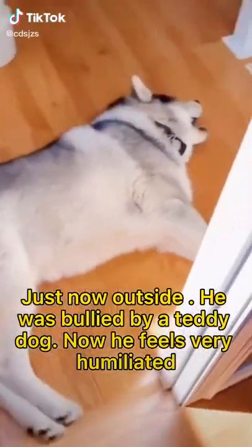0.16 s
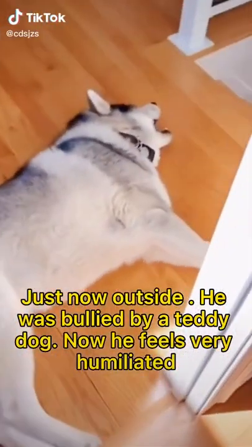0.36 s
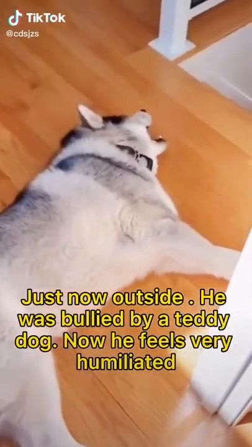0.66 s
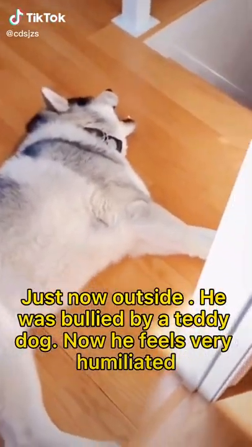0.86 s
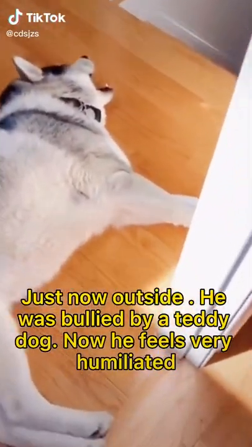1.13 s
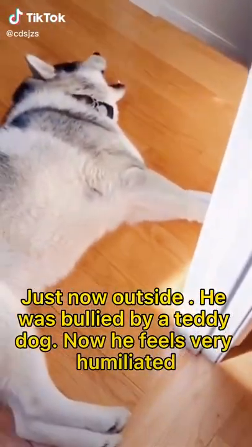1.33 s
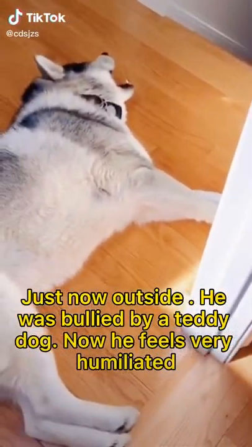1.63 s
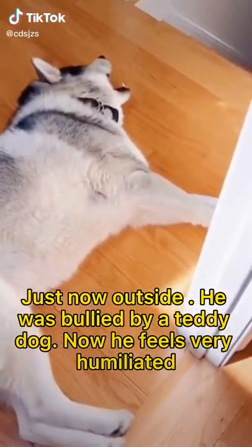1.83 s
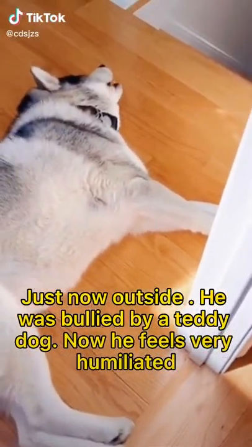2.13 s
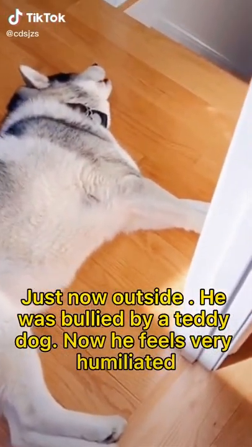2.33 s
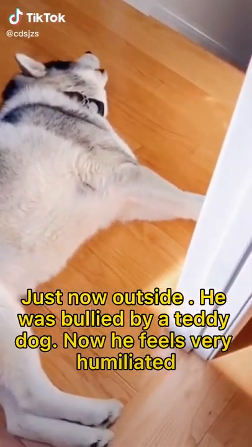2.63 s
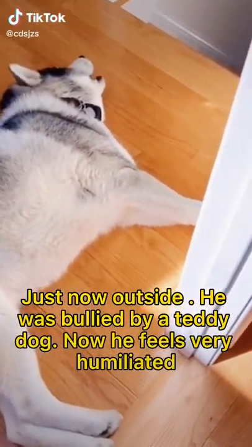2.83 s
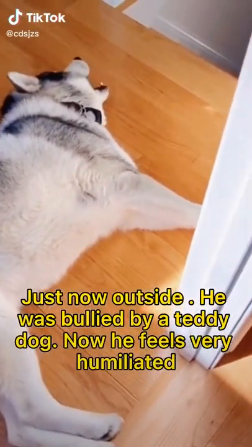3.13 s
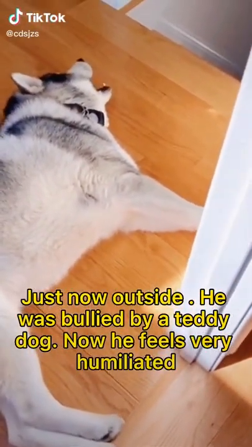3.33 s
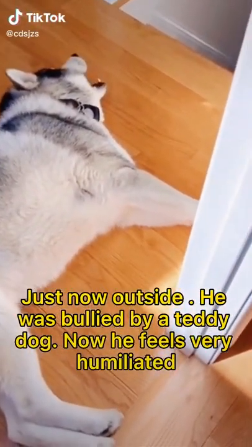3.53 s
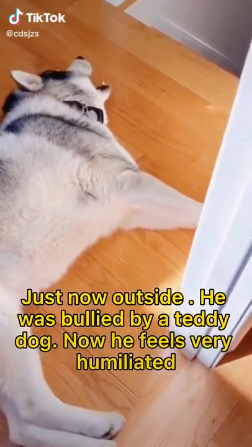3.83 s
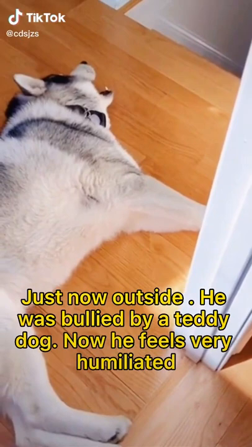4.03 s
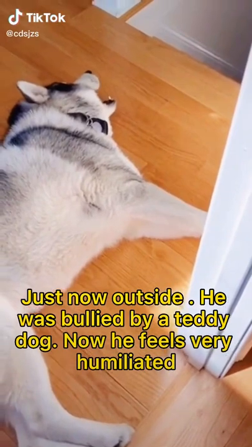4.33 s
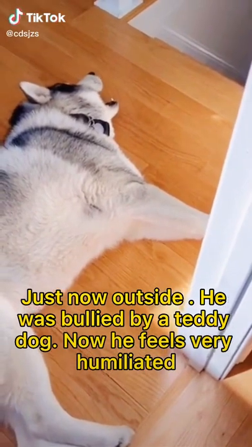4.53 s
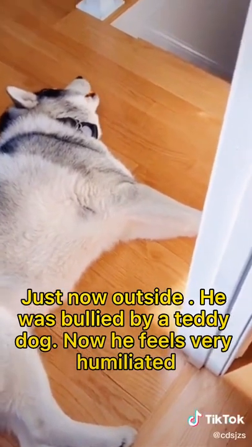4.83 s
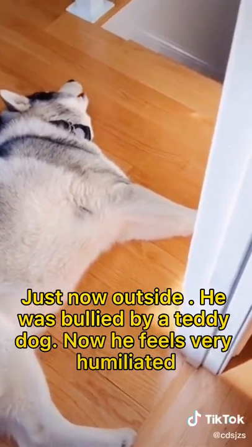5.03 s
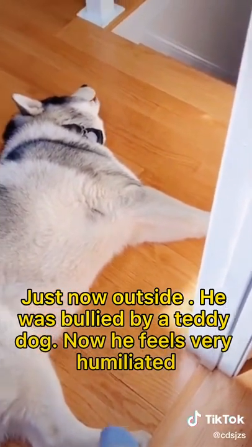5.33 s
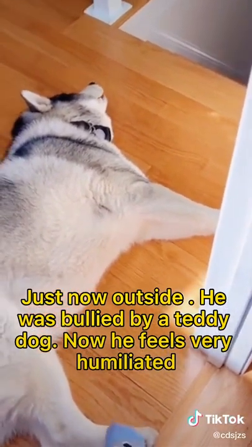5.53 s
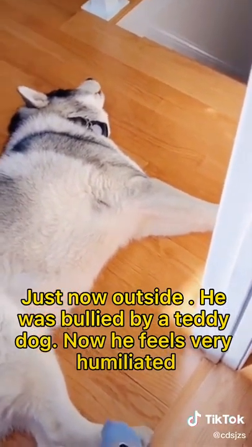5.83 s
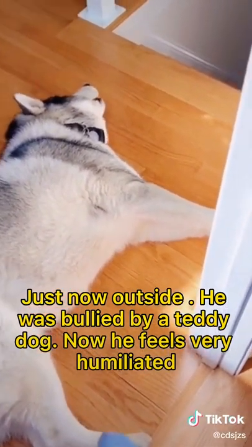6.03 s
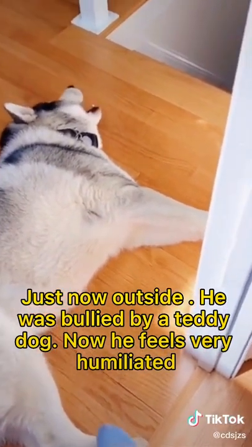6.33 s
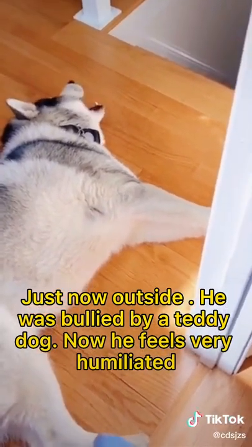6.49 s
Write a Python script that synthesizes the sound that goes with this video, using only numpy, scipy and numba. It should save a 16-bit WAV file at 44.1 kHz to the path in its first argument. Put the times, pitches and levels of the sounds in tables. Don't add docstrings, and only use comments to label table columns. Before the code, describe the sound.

A large dog howls three times in a bare echoing room, first a long pure steady note, then a hoarse cracking one, then a loud short one.

```python
import sys
import numpy as np
from scipy import signal
from scipy.fft import rfft, irfft, next_fast_len
from scipy.io import wavfile
from scipy.ndimage import uniform_filter1d, minimum_filter1d
from numba import njit

SR = 44100
rng = np.random.default_rng(int(sys.argv[2]) if len(sys.argv) > 2 else 0)


def volts_from_db(level):
    exponent = np.asarray(level, float) / 20
    return 10 ** exponent


def dump(signal):
    limited = np.clip(np.atleast_2d(signal).T, -1, 1)
    pcm = np.round(limited * 32767).astype(np.int16)
    wavfile.write(sys.argv[1], SR, pcm)


N = 293706
LEAD = SR // 2
STEP = 64

# f/Hz, level/dB
QUIET_ROOM = [(12, -40), (20, -4.5), (58, -15), (248, -24.5), (287, -35), (784, -33.5), (1380, -55.5),
              (2590, -46), (3000, -48.5), (3900, -86.5), (6600, -120)]
QUIET_ROOM_DB = -58.5
# t/s, peak level/dB
SHIFTS = [
    (2.144, -31.5),
    (2.309, -44),
]
RUSTLE_UP_DB_S, RUSTLE_DOWN_DB_S = 240, 198
HAND_DB, HAND_STOPS_S, HAND_FADE_DB_S = -54, 0.72, 32.5

# f/Hz, time/s
ECHO_TIMES = [(300, 0.37), (1000, 0.64), (3000, 0.42), (9000, 0.58)]
DIRECT_DB, ROOM_DB, FIRST_WALL_S = -5.5, -5, 0.0066
NEXT_ROOM_DB, NEXT_ROOM_SLOWER = -37, 1.5
EVENNESS, EVEN_S = 0.34, 0.14
# t/s, depth/dB, half-length/s
CANCELLATIONS = [
    (.065, 14, .015),
    (.172, 14, .015),
    (.3, 4, .02),
    (.43, 6, .03),
    (.77, 14, .025),
    (.86, 6, .13),
    (.945, 12, .025),
    (1.225, 10, .025),
    (1.42, 7, .02),
    (3.29, 8, .04),
]
NULL_TOP_HZ = 1050

FOLD_MOTIONS = {"pure": (-60, -60, .005), "clear": (-45, -45, .025), "veiled": (-31, -36, .03),
                "split": (-18, -26, .06), "doubled": (-9, -1, .05), "cracked": (-20, -20, .2),
                "gruff": (-8, -14, .13), "harsh": (-2, -14, .25), "rasp": (-3, -14, .3),
                "growl": (-10, 0, .14), "snap": (-3, -6, .45)}
# f/Hz, level/dB
THROAT_COLOUR = [(200, -23.5), (330, -5.5), (480, 6), (2400, -3.5), (2980, -19), (3300, -29), (3700, -31),
                 (4450, -46), (5400, -34), (6600, -40.5), (9200, -41.5), (11400, -40), (12600, -60.5),
                 (15500, -66)]
# f/Hz, level/dB
BREATH_COLOUR = [(285, -58), (350, -16.5), (790, -2.5), (950, -5), (1500, -16.5), (1750, -17), (2300, -6.5),
                 (2950, -18), (3250, -43.5), (3900, -29), (4600, -43.5), (6000, -31), (11500, -61),
                 (13000, -68)]
# t/s, pitch f/Hz, effort level/dB
HOWL_1 = [
    [(0.0, 682, -2), (0.18, 719, -2.5), (0.4, 739, -3), (0.67, 746, -3), (1.0, 744, -2.5), (1.2, 742, -2),
     (1.34, 736, -2), (1.73, 733, -1.5), (1.88, 716, -4)],
    [(1.885, 712, -10.5), (1.92, 660, -19), (1.95, 529, -28)],
]
HOWL_2 = [
    [(2.26, 318, -22.5), (2.295, 508, -5.5), (2.374, 662.5, -14.5), (2.47, 560, -11.5)],
    [(2.48, 535.7, -9.5), (2.608, 502.3, -11), (2.76, 582.7, -12), (2.87, 689, -7.5)],
    [(2.885, 612.5, -14), (2.97, 630, -12)],
    [(2.975, 662.5, -12), (3.095, 711, -11)],
    [(3.1, 728, -9.5), (3.132, 821.7, -8.5), (3.2, 801, -3)],
    [(3.21, 758.7, -7.5), (3.422, 729.3, -4.5), (3.54, 729.4, -12.5)],
    [(3.555, 677.7, -18), (3.72, 591, -21.5)],
    [(3.725, 782, -14.5), (3.76, 767.6, -9), (4.3, 783.6, -11), (4.63, 765.4, -12)],
]
HOWL_3 = [
    [(5.56, 349.7, -32.5), (5.64, 457.5, -13), (5.76, 531, -41.5)],
    [(5.755, 499, -28), (5.926, 673.5, -11.5), (6.06, 794, -7.5)],
    [(6.05, 708.3, -9), (6.095, 619, -12.5)],
    [(6.07, 580.6, -8.5), (6.21, 696.6, 0.5), (6.304, 800, 0.5), (6.36, 753.6, -2)],
    [(6.35, 753.4, -5.5), (6.39, 660, -15)],
    [(6.39, 653, -15), (6.556, 702.7, -10.5), (6.66, 686.4, -9.5)],
]
# fold motion, mouth level/dB (1-1.7 kHz), ring level/dB (above)
MOUTH_SHAPES = [("pure", -19.5, -14.5), ("clear", -2.5, -1.5), ("cracked", -23.5, -16),
                ("clear", -25, -16.5), ("clear", 2.5, -9), ("harsh", -7, -6.5), ("gruff", -13.5, -14),
                ("split", -18.5, -9), ("veiled", 2.1, -0.5), ("rasp", -18.5, -11.5), ("growl", -32.5, -24),
                ("doubled", -18.5, -17), ("snap", -16, -12.5), ("veiled", -27, -11), ("rasp", -8, -10.5),
                ("split", -1.5, -2.5)]
MOUTH_HZ, RING_HZ = 953.5, 1700
OPEN_DB_OCT, BRIGHT_DB_OCT = 18, 21
WIDEST_S, WIDE_FOR_S, WIDE_MOUTH_DB, WIDE_RING_DB = 0.92, 0.31, 5.5, 6.5
ONSET_GLIDE, ONSET_DB_S = .6, 61
FRAY_DB, FRAY_HZ, FRAY_HISS = 4, 3100, 3
FLICKER_DB, FLICKER_S = 2.5, .06

CEILING, RELEASE_S, ATTACK = .94, 0.074, 16


def on_log(hz, table):
    at, value = np.transpose(table)
    return np.interp(np.log(np.maximum(hz, 1)), np.log(at), value)


def coloured(table, size, lo_hz=0, hi_hz=SR):
    fast = next_fast_len(size)
    hz = np.arange(fast // 2 + 1) * SR / fast
    gain = volts_from_db(on_log(hz, table))
    gain = gain / np.sqrt(np.mean(gain ** 2))
    gain = gain * (hz >= lo_hz) * (hz < hi_hz)
    return irfft(rfft(rng.standard_normal(fast)) * gain, fast)[:size]


def wobble(hz, size):
    x = signal.sosfilt(signal.butter(2, hz, fs=SR, output="sos"), rng.standard_normal(size))
    return x / np.std(x)


def room_tone():
    return volts_from_db(QUIET_ROOM_DB + 1.5 * wobble(2.7, N)) * coloured(QUIET_ROOM, N)


def hand():
    rumble = coloured([(20, -2.5), (45, -6.0), (90, -16.0), (260, -18.5), (500, -52), (1000, -94.5)], N)
    still_s = np.maximum(np.arange(N) / SR - HAND_STOPS_S, 0)
    return volts_from_db(HAND_DB - HAND_FADE_DB_S * still_s) * rumble


def rustle():
    t = np.arange(N) / SR
    rubbing = coloured([(30, -29.5), (60, -3.5), (250, -2.5), (600, -12.5), (2000, -59.5)], N)
    swells = [volts_from_db(db + np.minimum(RUSTLE_UP_DB_S * (t - s), RUSTLE_DOWN_DB_S * (s - t))) for s, db in SHIFTS]
    return rubbing * sum(swells)


def even_out(response):
    size = 4 * SR
    bins = rfft(response, size)
    cepstrum = irfft(np.log(np.abs(bins) + 1e-3))
    cepstrum[1:2 * SR] *= 2
    cepstrum[2 * SR + 1:] = 0
    smooth = rfft(cepstrum * np.exp(-np.arange(size) / SR / EVEN_S))
    return irfft(bins * np.exp(-EVENNESS * smooth))[:SR]


def room():
    t = np.arange(SR) / SR
    tail = np.zeros(SR)
    for hz in 125 * 2. ** np.arange(7):
        band = signal.butter(2, [hz / np.sqrt(2), hz * np.sqrt(2)], "bandpass", fs=SR, output="sos")
        fade = volts_from_db(-60 * t / on_log(hz, ECHO_TIMES))
        next_room = volts_from_db(NEXT_ROOM_DB) * fade ** (1 / NEXT_ROOM_SLOWER)
        tail += signal.sosfilt(band, rng.standard_normal(SR)) * (fade + next_room)
    tail *= np.clip(t / FIRST_WALL_S - 1, 0, 1)
    tail *= volts_from_db(ROOM_DB) / np.sqrt(np.sum(tail ** 2))
    tail[0] = volts_from_db(DIRECT_DB)
    return even_out(tail)


def cancel_lowest(heard):
    t = np.arange(N) / SR
    low = signal.sosfiltfilt(signal.butter(4, NULL_TOP_HZ, fs=SR, output="sos"), heard)
    null_db = sum(db * np.exp(-((t - s) / wide_s) ** 2) for s, db, wide_s in CANCELLATIONS)
    return heard - low * (1 - volts_from_db(-null_db))


def fray(hoarse):
    return min(hoarse / .03, 1)


@njit
def lines(turns, gains, step):
    y = np.zeros(len(turns))
    for i in range(len(turns)):
        turn = np.exp(2j * np.pi * turns[i])
        z, row, part = turn, i // step, (i % step) / step
        for k in range(gains.shape[1]):
            y[i] += z.imag * (gains[row, k] + part * (gains[row + 1, k] - gains[row, k]))
            z *= turn
    return y


def folds(hz, mouth_db, ring_db, half_db, lowest_db, hoarse):
    size = len(hz) - STEP
    shake = 0.0024 * wobble(30, size) + .05 * hoarse * wobble(160, size) + .07 * hoarse * wobble(14, size)
    turns = np.cumsum(hz[:size] * (1 + shake)) / SR / 2
    multiple = np.arange(1, 43)
    line_hz = hz[::STEP, None] * multiple / 2
    opened = 1 / (1 + np.exp(np.log(MOUTH_HZ / line_hz) / 0.19))
    ringing = 1 / (1 + np.exp(np.log(RING_HZ / line_hz) / 0.05))
    shape_db = mouth_db[::STEP, None] * (opened - ringing) + ring_db[::STEP, None] * ringing
    gains = volts_from_db(shape_db + half_db * (multiple % 2)) * (line_hz < .4 * SR)
    gains *= volts_from_db(-FRAY_DB * fray(hoarse) / (1 + (FRAY_HZ / line_hz) ** 20))
    rows = int(FLICKER_S * SR / STEP)
    flicker = uniform_filter1d(rng.standard_normal(gains.shape), size=rows, axis=0)
    flicker = uniform_filter1d(flicker, size=rows, axis=0)
    gains *= volts_from_db(FLICKER_DB * np.sqrt(1.5 * rows) * flicker * (multiple > 2))
    gains[:, 0] *= volts_from_db(lowest_db - half_db)
    return np.sqrt(2) * lines(turns, gains, STEP) * (1 + 0.6 * hoarse * wobble(170, size))


def throat(voice, lowest_hz):
    size = len(voice)
    fast = next_fast_len(size + SR // 10)
    bin_hz = np.arange(fast // 2 + 1) * SR / fast
    passed = volts_from_db(on_log(bin_hz, THROAT_COLOUR)) / (1 + (0.52 * lowest_hz / (bin_hz + 1)) ** 10)
    return irfft(rfft(voice, fast) * passed, fast)[:size]


def breath(mouth_db, ring_db, hoarse):
    size = len(mouth_db)
    air = coloured(BREATH_COLOUR, size, hi_hz=MOUTH_HZ)
    air = air + volts_from_db(mouth_db + 16.5) * coloured(BREATH_COLOUR, size, lo_hz=MOUTH_HZ, hi_hz=RING_HZ)
    air = air + volts_from_db(ring_db + 0.5) * coloured(BREATH_COLOUR, size, lo_hz=RING_HZ)
    air *= volts_from_db(3.9 * wobble(35, size))
    hiss = 0.04 * (1 + FRAY_HISS * fray(hoarse)) * volts_from_db(ring_db)
    hiss = hiss * coloured(BREATH_COLOUR, size, lo_hz=2 * RING_HZ)
    return 1.745 * hoarse * air + hiss


def register(glide, half_db, lowest_db, hoarse, mouth_db, ring_db):
    s, pitch_hz, effort_db = np.transpose(glide)
    start = 0 if s[0] < .01 else LEAD + int(s[0] * SR)
    end = min(LEAD + int(s[-1] * SR), LEAD + N)
    t = (np.arange(start, end + STEP) - LEAD) / SR
    size = len(t) - STEP
    hz, level_db = np.interp(t, s, pitch_hz), np.interp(t, s, effort_db)
    wide = np.exp(-((t - WIDEST_S) / WIDE_FOR_S) ** 2)
    climb = np.log2(hz / pitch_hz.mean())
    mouth_db = mouth_db + OPEN_DB_OCT * climb + WIDE_MOUTH_DB * wide
    ring_db = ring_db + BRIGHT_DB_OCT * climb + WIDE_RING_DB * wide
    before_s = np.minimum(t, 0)
    hz, level_db = hz * (1 + ONSET_GLIDE * before_s), level_db + ONSET_DB_S * before_s
    voice = throat(folds(hz, mouth_db, ring_db, half_db, lowest_db, hoarse), pitch_hz.min())
    sound = np.sqrt(1 - hoarse) * voice + breath(mouth_db[:size], ring_db[:size], hoarse)
    edge = np.clip(np.minimum(t - t[0], t[size] - t)[:size] / 0.0079, 0, 1)
    out = np.zeros(LEAD + N)
    out[start:start + size] = volts_from_db(level_db[:size]) * edge * sound
    return out


def dog():
    glides = HOWL_1 + HOWL_2 + HOWL_3
    return sum(register(glide, *FOLD_MOTIONS[motion], mouth_db, ring_db)
               for glide, (motion, mouth_db, ring_db) in zip(glides, MOUTH_SHAPES))


def scene():
    heard = signal.fftconvolve(dog(), room())[LEAD:LEAD + N]
    return (cancel_lowest(heard) + room_tone() + rustle() + hand())[None]


@njit
def follow(x, ceiling, release):
    y, e = np.empty(len(x)), ceiling
    for i in range(len(x)):
        e = max(abs(x[i]), e + (ceiling - e) * release)
        y[i] = e
    return y


def limit(x):
    gain = CEILING / follow(x, CEILING, 1 / (RELEASE_S * SR))
    lowest = minimum_filter1d(gain, size=ATTACK)
    return x * uniform_filter1d(lowest, size=ATTACK)


def low_pass(x):
    return signal.sosfilt(signal.butter(12, 15700, fs=SR, output="sos"), x)


def record(dry):
    mix = limit(dry[0])[None]
    return low_pass(mix)


dry = scene()
out = record(dry)
dump(out)
```